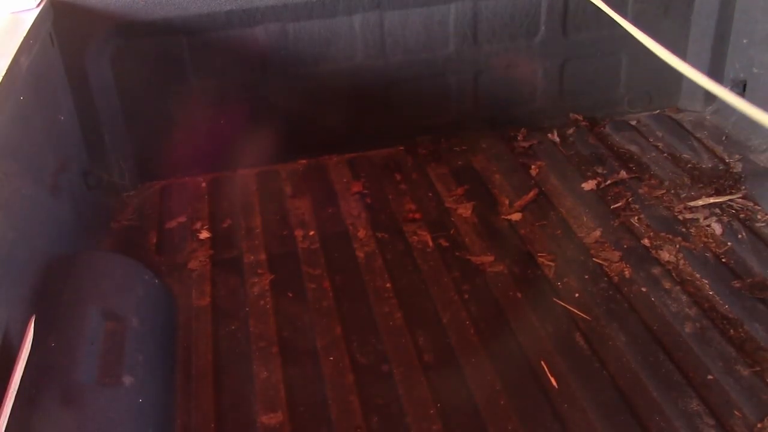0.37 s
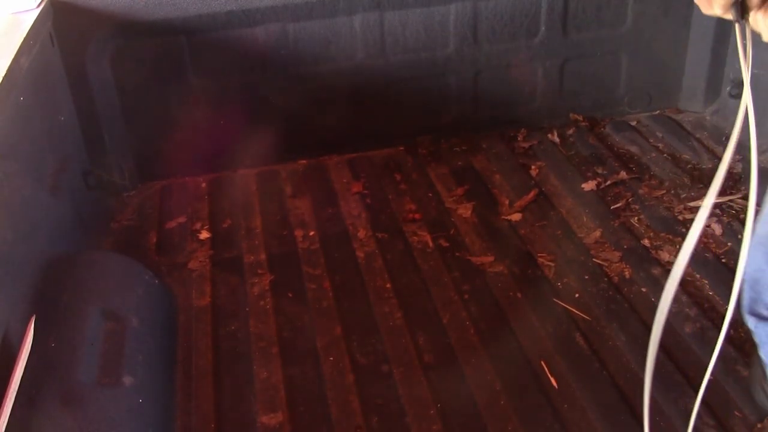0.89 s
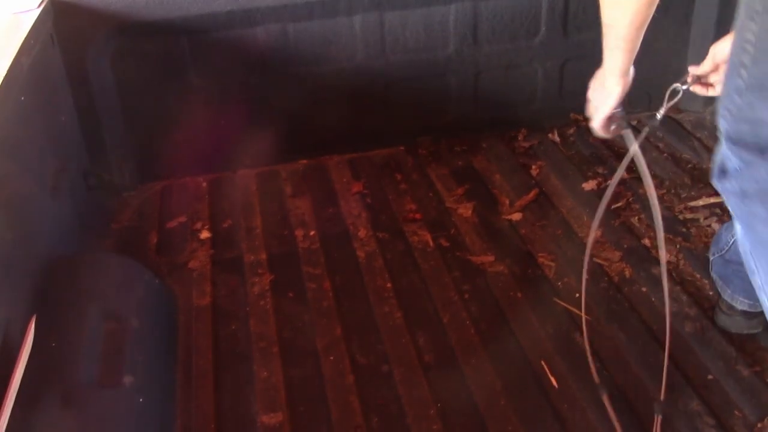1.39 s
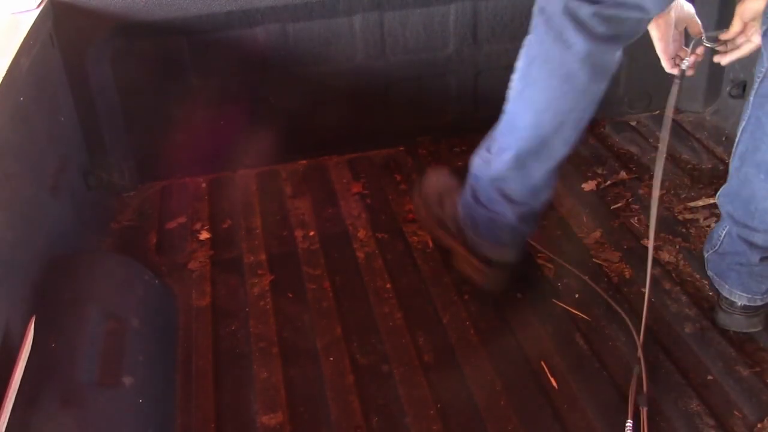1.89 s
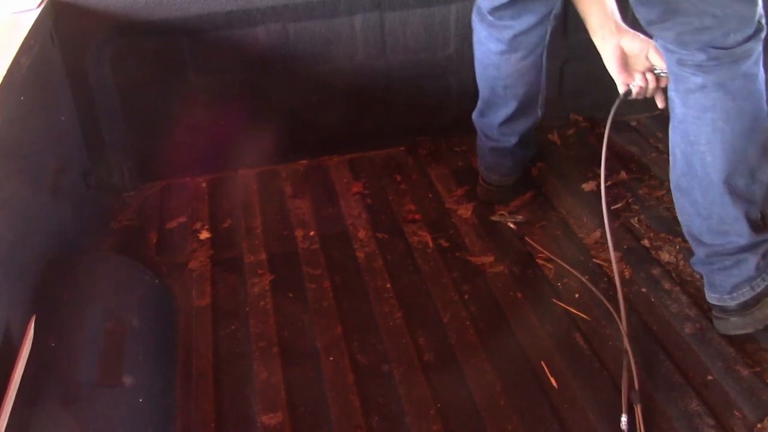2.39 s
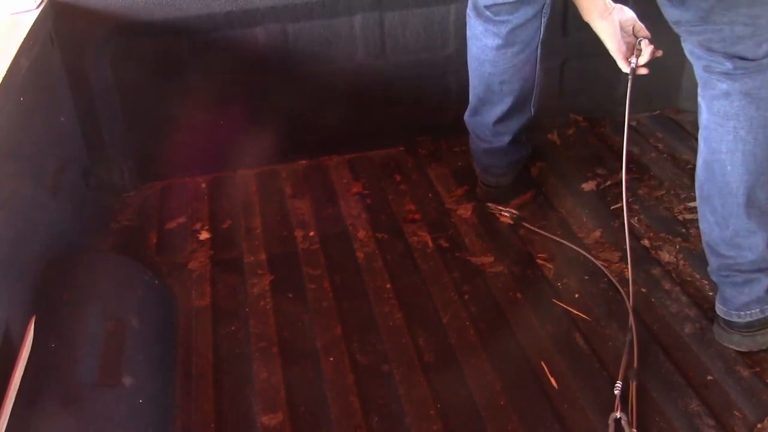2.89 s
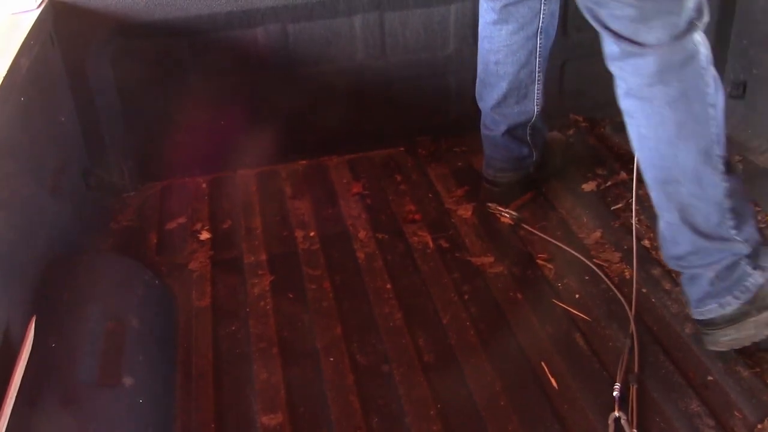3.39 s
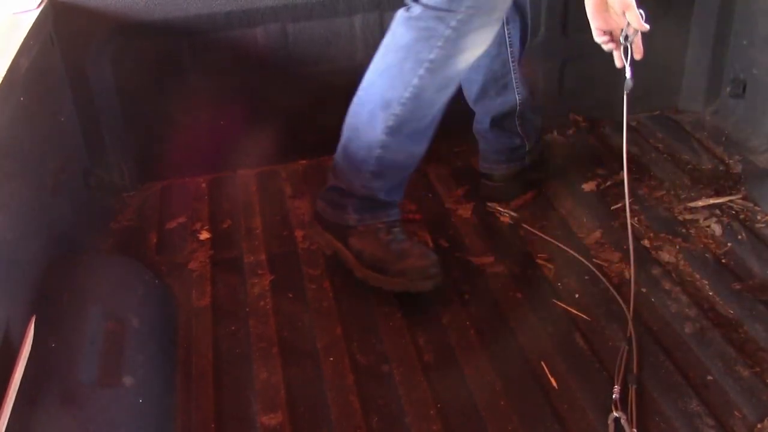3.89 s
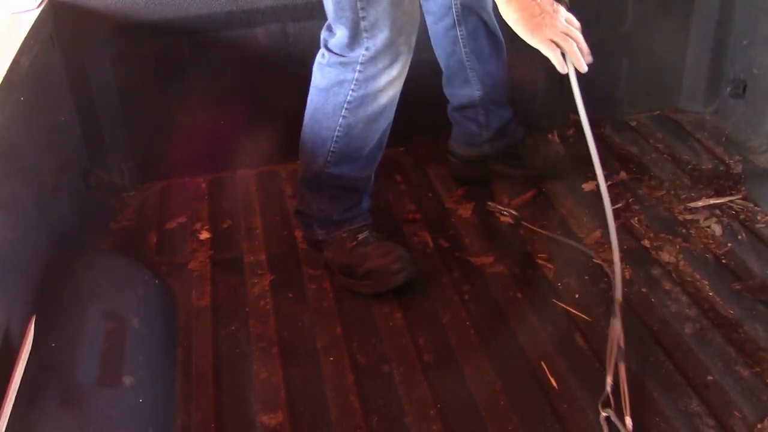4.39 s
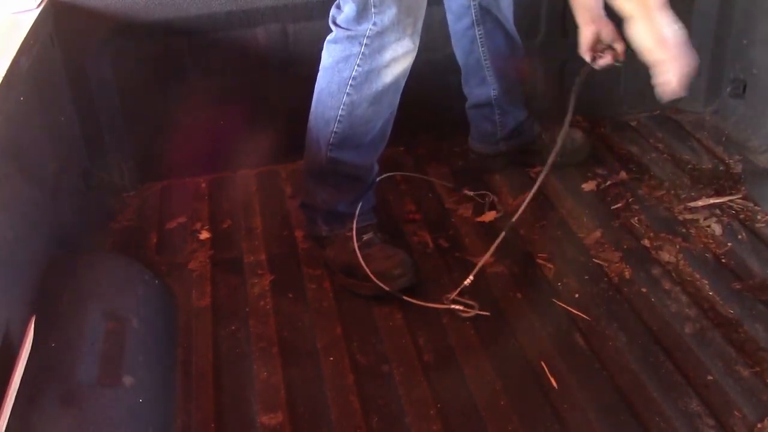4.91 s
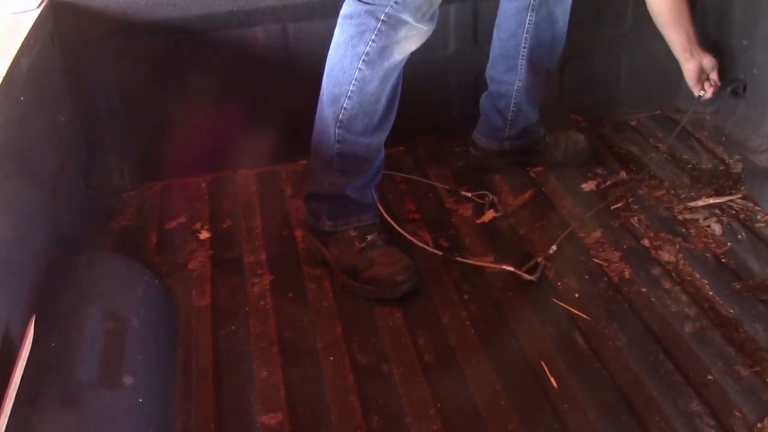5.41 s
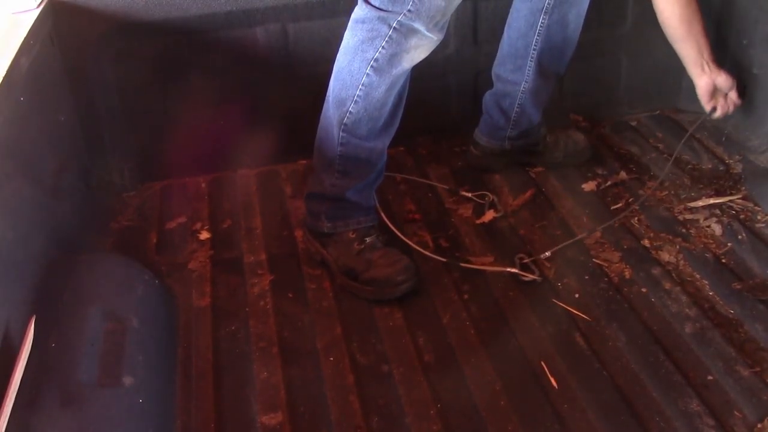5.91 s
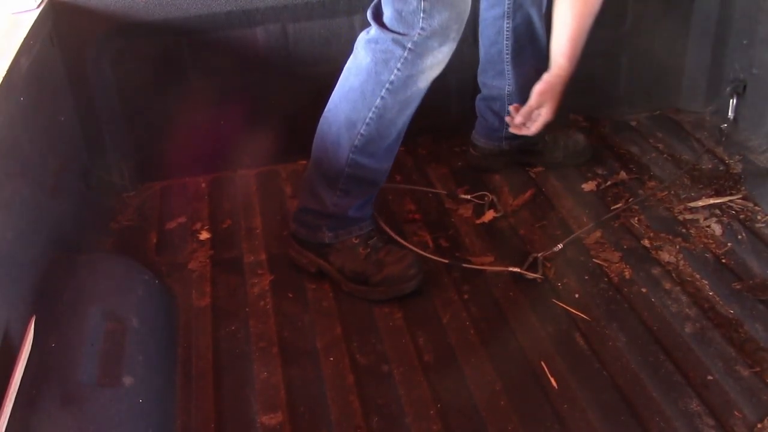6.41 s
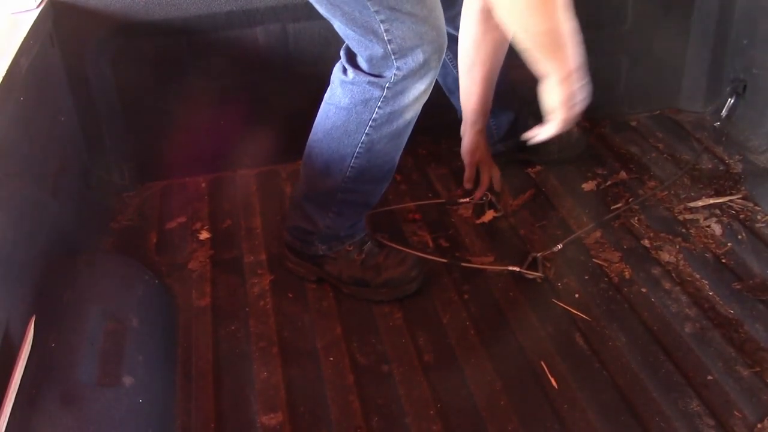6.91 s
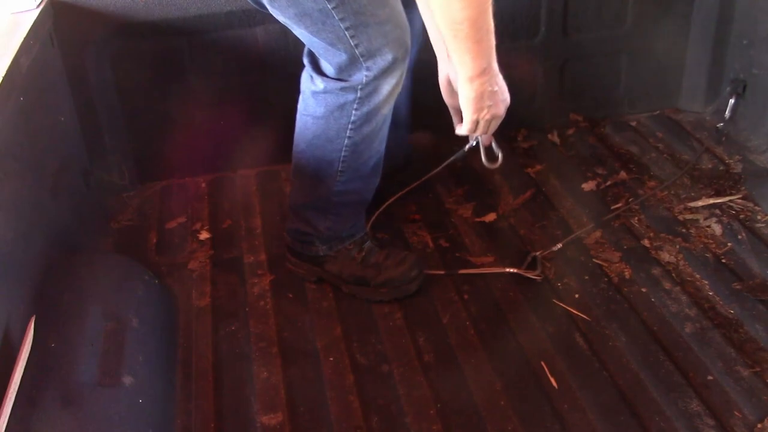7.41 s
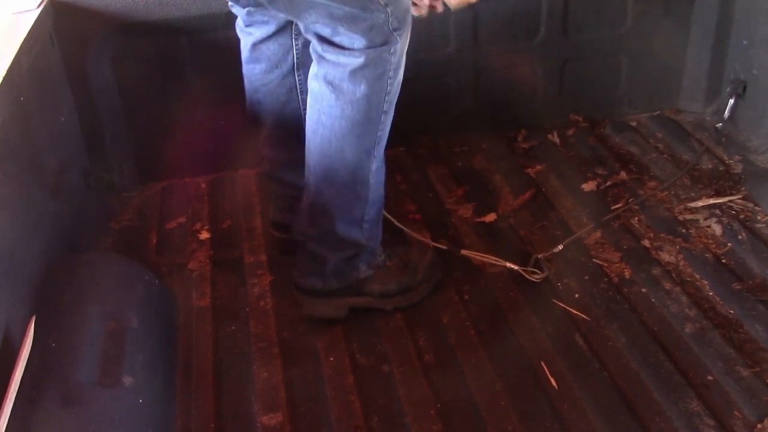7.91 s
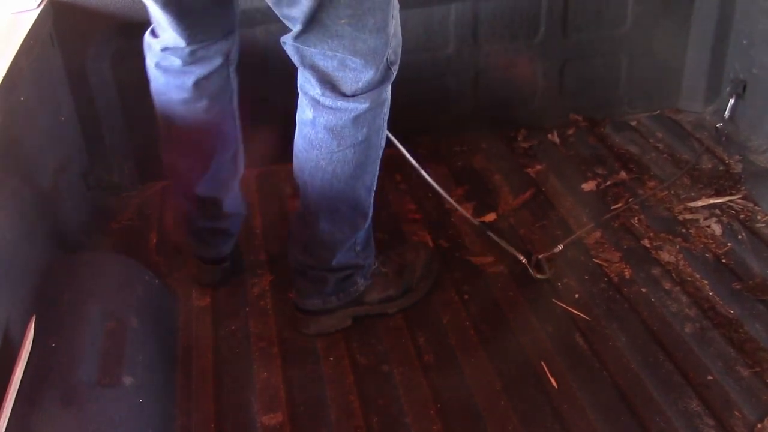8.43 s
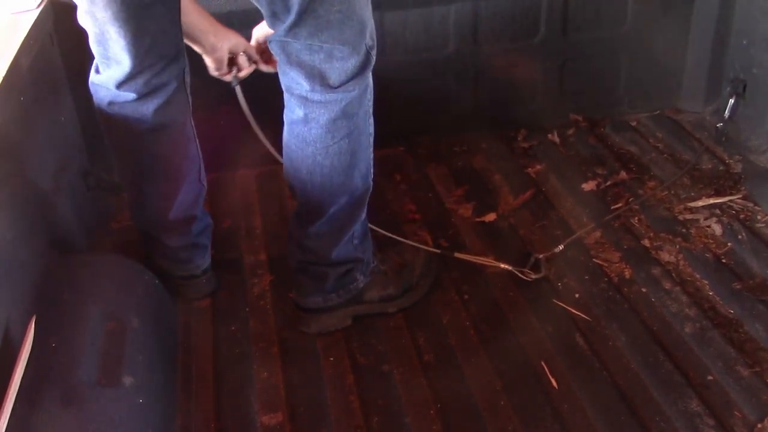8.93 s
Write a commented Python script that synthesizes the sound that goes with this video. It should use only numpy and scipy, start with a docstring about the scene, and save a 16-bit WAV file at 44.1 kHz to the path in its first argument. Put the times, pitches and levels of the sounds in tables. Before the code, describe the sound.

Close, dry knocks of footsteps and dropped cable on a plastic-lined pickup bed, with bright metal ticks, gritty scrapes and quiet outdoor air.

```python
"""Boots and cable on a truck bed

Someone steps about on the ribbed plastic liner of a pickup bed and handles a steel cable with a hook.
Boots and dropped steel ring the chassis, floor pan, ribs and thin liner as decaying modes.
Soles and cable drag over grit as uneven noise; the hook ticks with short bright noise and weak partials.
A faint squeak slides down. A small microphone lies close by in quiet open air."""
import sys
import numpy as np
from scipy import signal
from scipy.fft import rfft, irfft
from scipy.io import wavfile
from scipy.ndimage import uniform_filter1d

SR = 44100
rng = np.random.default_rng(int(sys.argv[2]) if len(sys.argv) > 2 else 0)


def materialize(psi):
    """Save the field psi as 16-bit PCM at rate SR to the path in sys.argv[1].

    A 1-D psi becomes a single channel; in a 2-D psi each row is a channel.
    """
    bounded = np.clip(np.atleast_2d(psi).T, -1, 1)
    quanta = np.round(bounded * 32767).astype(np.int16)
    wavfile.write(sys.argv[1], SR, quanta)


def to_linear_factor(level_db):
    """Convert decibel levels (scalar or array-like) to linear amplitude factors."""
    exponent = np.asarray(level_db, float) / 20
    return 10 ** exponent


N = 399105


def coloured(points, size):
    """Spectral shaping: noise of rms 1 whose spectrum follows (frequency [Hz], level [dB]) points."""
    hz, db = np.transpose(points)
    log_hz = np.log(np.arange(size // 2 + 1) * SR / size + 1)
    gain = to_linear_factor(np.interp(log_hz, np.log(hz), db))
    noise = irfft(rfft(rng.standard_normal(size)) * gain, size)
    return noise / noise.std()


def fade(t, t60):
    """Exponential decay: the level falls 60 dB in t60 seconds."""
    return np.exp(-np.log(1000) * t / t60)


def rings(modes, t):
    """Modal synthesis: one decaying sine a mode, neighbours in opposite sign, low modes starting gently."""
    hz, db, t60 = np.array(modes, float).T[:, :, None]
    sign = (-1.) ** np.arange(len(modes))[:, None]
    start = (1 - np.exp(-hz * t * 6.1)) ** 2
    decay = fade(t, np.maximum(t60, .02))
    return sign * to_linear_factor(db) * np.sin(2 * np.pi * hz * t) * decay * start


def grains(shape, spread_db):
    """Impulsive excitation: tiny impacts of either sign, few of them large."""
    return rng.standard_normal(shape) * to_linear_factor(spread_db * rng.standard_exponential(shape))


def rough(points, spread_db, ms):
    """Stick-slip friction: coloured noise of rms 1 whose level jumps from slip to slip."""
    hold = int(ms * SR / 1000) + 1
    jumps = np.repeat(rng.standard_normal(N // hold + 1), hold)[:N]
    jumps = uniform_filter1d(jumps, hold)
    noise = coloured(points, N) * to_linear_factor(spread_db * jumps)
    return noise / noise.std()


def resonant(peaks):
    """Resonance: spectrum points of a few peaks over a low floor."""
    hz = np.geomspace(200, 16000, num=400)
    power = sum(to_linear_factor(2 * db) / (1 + (2 * (hz - f) / w) ** 2) ** 2 for f, w, db in peaks)
    return np.c_[hz, 10 * np.log10(power + 1e-9)]


def strokes(table, rise_db_s, fall_db_s):
    """Envelope: gain of each level column; every stroke swells, holds and dies away, and powers add."""
    t, power = np.arange(N) / SR, np.zeros((len(table[0]) - 2, N))
    for s, hold, *db in table:
        # each stroke is cut where it lies 70 dB below its hold
        first = max(int((s - 70 / rise_db_s) * SR), 0)
        i = slice(first, int((s + hold + 70 / fall_db_s) * SR))
        rise, fall = (t[i] - s) * rise_db_s, (s + hold - t[i]) * fall_db_s
        shape = np.minimum(0, np.minimum(rise, fall))
        power[:, i] += to_linear_factor(2 * (np.array(db)[:, None] + shape))
    return np.sqrt(power)


def played(table):
    """Linear interpolation: a curve table's columns, one value a sample; its level is -120 dB outside."""
    s, *columns = np.transpose(table)
    return [np.interp(np.arange(N) / SR, s, c, left=-120, right=-120) for c in columns]


def add(out, sound, s):
    """Superposition: mixes a sound in at time s."""
    i = int(s * SR)
    out[i:i + len(sound)] += sound[:len(out) - i]


# spectrum of the quiet open air: (frequency [Hz], relative level [dB per Hz])
AIR = [(15, -19.5), (25, -4), (45, 1), (120, -9), (240, -11.5), (330, -18), (600, -20), (2300, -26.5),
       (6000, -29), (10500, -31), (14000, -33.5), (16000, -38.5)]


def air():
    """Stationary noise: a steady, low-heavy hush at -68 dB rms."""
    return to_linear_factor(-68) * coloured(AIR, N)


def yard(hits):
    """Diffuse reflection: the hits convolved with a short decaying noise, as nearby surfaces return it."""
    t, t60_s, return_db = np.arange(SR // 2) / SR, 0.26, -18.5
    spectrum = [(100, -15), (500, -2.5), (1200, -9.5), (4000, -9.5), (12000, -21.5)]  # (Hz, dB per Hz)
    echo = coloured(spectrum, len(t)) * fade(t, t60_s)
    echo = echo / np.sqrt(np.sum(echo ** 2))
    return to_linear_factor(return_db) * signal.fftconvolve(hits, echo)[:N]


# course of a faint falling squeak: (time [s], frequency [Hz], rms level [dB])
SQUEAK = [(7.41, 717, -83.5), (7.442, 716, -67.5), (7.452, 673, -66), (7.486, 604, -81), (7.51, 603, -80)]


def squeak():
    """Frequency modulation: the phase of a tone that slides down is its frequency summed over time."""
    hz, db = played(SQUEAK)
    return np.sqrt(2) * to_linear_factor(db) * np.sin(2 * np.pi * np.cumsum(hz) / SR)


# a sole brushed across the ribs: (time [s], hold [s], level [dB])
SCUFFS = [(3.775, 0.1, -57.5), (6.5, 0.084, -55), (6.61, 0.04, -52)]
# spectrum of the brushing: (frequency [Hz], relative level [dB per Hz])
SCUFF = [(290, -41), (500, -4), (960, -1.5), (1060, -5), (1230, -1), (1530, -5), (1980, -2), (6610, -17),
         (10700, -10.5), (16000, -30)]


def scuffs():
    """Sliding friction: a fine, fairly even hiss with clear ends."""
    gain = strokes(SCUFFS, rise_db_s=498, fall_db_s=450)[0]
    return gain * rough(SCUFF, spread_db=1.9, ms=24.0)


# cable pulled over an edge, stroke by stroke: (time [s], hold [s], rasp level [dB], jingle level [dB])
PULL = [(.285, .02, -52, -63), (.335, 0.029, -40.5, -55.5), (.44, 0.06, -39.5, -54),
        (.53, 0.029, -44, -59.5), (.595, .02, -45, -61), (.65, 0.0068, -53.5, -77)]
# wall resonances that colour the rasp: (frequency [Hz], width 6 dB down [Hz], relative level [dB])
RASP = [(660, 240, 3.5), (940, 490, -3.5), (1470, 330, 1.5), (1910, 310, -13)]
# resonances of the jingling hook: (frequency [Hz], width 6 dB down [Hz], relative level [dB])
JINGLE = [(2980, 670, -9), (3840, 737, 2), (5700, 1700, -2.5), (7840, 1400, -3.5), (10300, 2100, 0),
          (12540, 1400, -17)]


def cable():
    """Friction-driven resonance: strands rasp in the wall's resonances while the hook jingles."""
    rasp_gain, jingle_gain = strokes(PULL, rise_db_s=450, fall_db_s=400)
    rasp = rough(resonant(RASP), spread_db=1.6, ms=5.0)
    jingle = rough(resonant(JINGLE), spread_db=2.8, ms=9.9)
    return rasp_gain * rasp + jingle_gain * jingle


# modes of the bed's parts: (frequency [Hz], relative level [dB], t60 before any choking [s])
CHASSIS = [(44.7, -16.5, 0.13), (55, -1, 0.66), (74.5, -3.5, 0.93), (79.7, -2.5, 0.37)]
PAN = [(115, -6.5, 0.16), (153, -4.5, 0.23), (178.5, -4, 0.12), (229, -2, 0.14), (258, -10.5, 0.64)]
RIBS = [(289.6, -6, 0.2), (355, -3, 0.16), (409, -4.5, 0.16), (483.4, -3, 0.081), (551.1, -7.5, .15),
        (591, -8, 0.16), (672, -9, 0.051)]


def bed_parts(t):
    """Modal decomposition: mode frequencies and ringing modes of chassis, floor pan and ribs."""
    return [(np.array(modes)[:, 0], rings(modes, t)) for modes in (CHASSIS, PAN, RIBS)]


# spectrum of the thin liner, whose modes are too many to tell apart:
# (frequency [Hz], relative level [dB per Hz])
LINER = [(450, -29.5), (650, 6.5), (800, 5.5), (1100, -0.5), (1500, -6.5), (1900, -14.5), (2500, -25),
         (3500, -30.5), (9000, -76)]


def liner(t, t60):
    """High modal density: a crowd of close modes sounds as decaying noise, new at every call."""
    return coloured(LINER, len(t)) * fade(t, t60) * (1 - np.exp(-t / 0.0022)) ** 2


# weight shifting on the floor: (time [s], hold [s], chassis level [dB], body level [dB]);
# the pan and the ribs each sound a fixed step below the body level
SHIFTS = [(.24, 0.046, -65, -65), (.29, 0.11, -53, -54), (.44, 0.059, -46, -52.5), (.56, 0.18, -65, -65.5),
          (.775, 0.033, -42, -55), (1.17, 0.025, -40, -50), (1.57, 0.037, -51, -47.5),
          (.93, 0.073, -47, -35), (1.08, 0.41, -53.5, -39), (1.72, 0.085, -46, -32),
          (1.9, 0.024, -67, -45.5), (2.05, 0.11, -65, -64), (2.205, 0.066, -34, -53.5),
          (2.36, 0.045, -61, -58), (2.49, 0.16, -57, -50), (2.75, 0.014, -62, -56),
          (3.19, 0.041, -56, -66.5), (3.21, 0.012, -56, -56.5), (3.32, 0.077, -58, -59),
          (3.75, .14, -60.5, -70.5), (4.36, 0.038, -58, -55), (4.45, 0.13, -70.5, -66),
          (4.66, .1, -49.5, -49), (4.8, 0.097, -58, -32), (4.9, 0.29, -55, -47.5), (5.165, .04, -52, -38),
          (5.26, 0.071, -38, -39.5), (5.5, 0.037, -48.5, -40.5), (5.72, 0.092, -59, -42),
          (5.88, 0.015, -48, -30), (5.96, 0.15, -58.5, -41.5), (6.44, .04, -59.5, -65),
          (6.49, 0.14, -50.5, -58.5), (6.3, 0.052, -59.5, -64.5), (6.72, 0.033, -57, -78.5),
          (6.96, 0.031, -53, -71.5), (7.29, 0.063, -56.5, -58.5), (7.03, 0.12, -59.5, -52),
          (7.54, 0.084, -33.5, -47.5), (7.65, 0.026, -61, -49), (7.75, 0.027, -46, -70),
          (7.955, .02, -38, -53.5), (8.05, 0.25, -65, -67.5), (8.57, .06, -37, -56), (8.68, 0.12, -49, -63),
          (9.0, .05, -64, -67.5)]
# soles and cable sliding: (time [s], hold [s], liner level [dB], grit hiss level [dB])
SLIDES = [(.66, 0.66, -58.5, -70.5), (1.33, .06, -47.5, -69.5), (1.44, 0.19, -56.5, -71.5),
          (1.72, 0.12, -51.5, -67), (1.9, 0.023, -56.5, -72.5), (2.22, .05, -62.5, -66),
          (2.48, 0.18, -63.5, -76.5), (3.28, .07, -87, -82), (4.35, 0.64, -74.5, -76),
          (4.8, 0.053, -45.5, -63), (5.065, .03, -50.5, -68.5), (5.15, 0.15, -48, -64.5),
          (5.33, 0.22, -60.5, -71), (5.72, 0.051, -58, -69), (5.83, 0.084, -49, -60),
          (6.0, 0.19, -66.5, -68.5), (6.6, 0.032, -76, -65), (7.03, 0.048, -88.5, -72),
          (7.36, .02, -80, -75), (7.68, 0.18, -73, -77.5), (7.97, 0.25, -73, -76), (8.65, .04, -67, -74)]
# spectrum of the grit: (frequency [Hz], relative level [dB per Hz])
GRIT = [(1180, -32.5), (2000, -3), (2460, -6), (3230, -4), (3770, -7.5), (5990, -7), (6880, -8.5),
        (11000, -5.5), (16000, -37)]


def dragging(t):
    """Stick-slip excitation: dense slips drive the parts, damped by the weight; liner and grit hiss."""
    chassis, body = strokes(SHIFTS, rise_db_s=800, fall_db_s=170)
    sheet, grit = strokes(SLIDES, rise_db_s=250.5, fall_db_s=120.5)
    out = sheet * rough(LINER, 5.5, 11.0) + grit * rough(GRIT, 1.5, 11.0)
    gains = (chassis, body * to_linear_factor(-2.0), body * to_linear_factor(-3.5))
    for (_, ringing), gain in zip(bed_parts(t), gains):
        slips = grains(N, 2.2) * (rng.random(N) < .08)
        damped = ringing.sum(0) * fade(t, 0.087)
        ring = signal.fftconvolve(slips, damped)[:N]
        out = out + gain * ring / ring.std()
    return out


# hook, cable and grit clicks:
# (time [s], relative crack level [dB], relative bright edge level [dB], glint [Hz], tail t60 [s])
TICKS = [(0.434, -44.5, -40, 9340, 0.2), (0.5822, -45, -40, 8500, 0.077), (0.7631, -54, -58, 7990, 0.2),
         (0.8549, -59, -46.5, 8100, 0.12), (0.8898, -44.5, -53, 3800, 0.33),
         (0.9384, -54, -39, 10000, 0.13), (1.155, -27, -43, 4000, 0.14),
         (1.3891, -50.5, -51.5, 10100, 0.25), (1.4933, -46, -63.5, 3610, 0.13),
         (1.6143, -26, -27, 10600, 0.17), (1.6244, -26, -31, 10200, 0.11),
         (2.1968, -56.5, -50, 10000, 0.13), (2.2098, -46.5, -46, 10300, 0.26),
         (2.2383, -57, -48, 9100, 0.23), (3.2094, -64, -62, 6420, 0.13),  (4.5849, -54, -55, 5260, 0.21),
         (4.797, -53, -52.5, 9560, 0.091), (4.8542, -48, -48, 3660, 0.11), (4.8724, -60, -52, 9360, 0.092),
         (4.9366, -70, -54, 9600, 0.093), (5.057, -47.5, -79, 3640, 0.14),
         (5.2524, -44.5, -50, 10700, 0.33), (5.4115, -43, -49.5, 6540, 0.16),
         (5.5054, -40.5, -48.5, 6880, 0.076), (5.524, -30.5, -36.5, 9860, 0.1),
         (5.6634, -33, -43.5, 4600, 0.075), (5.6849, -28, -34.5, 9320, 0.077),
         (5.799, -3, -16.5, 3840, 0.12), (5.8074, -9.5, -11, 9560, 0.083),
         (5.9544, -42.5, -49, 3730, 0.075), (6.0058, -43.5, -56, 4130, 0.12),
         (6.0456, -33.5, -53, 3700, 0.13), (6.3025, -55.5, -57, 8700, 0.097),
         (7.0194, -74, -59.5, 9640, 0.17), (7.1221, -54, -56, 9910, 0.16), (7.3356, -36, -55, 4670, 0.083),
         (7.5262, -45, -49.5, 4020, 0.33), (7.9444, -57, -64, 7760, 0.34), (8.5581, -39, -65, 4430, 0.12)]
# spectra of the dry crack and the bright edge: (frequency [Hz], relative level [dB per Hz])
CRACK = [(400, -49.5), (1000, -12.5), (1800, 3), (3000, -6.5), (5000, -14), (7000, -21), (14000, -50)]
EDGE = [(1500, -51), (4000, -15.5), (6000, -1.5), (8000, -2.5), (10300, 1), (13000, -9), (16000, -16.5)]
# steel hook and its ring: (frequency [Hz], relative level [dB], t60 before the tail's own fade [s])
HOOK = [(1468, 1, 0.45), (1816, -3, 0.22), (1930, -8, 0.33), (2439, -5, 0.17), (2960, -6, 0.073),
        (3070, -12.5, 0.3), (3655, -10.5, 0.15), (3760, -18.5, 0.32), (4247, -14.5, 0.14),
        (6700, -14.5, 0.13)]


def ticks():
    """Impact radiation: a dry bright crack, a hissing tail off the bed walls, a glint, weak steel partials."""
    out, t = np.zeros(N), np.arange(SR // 4) / SR
    partials = rings(HOOK, t)
    hook_db, spread_db = -18, 6.3  # partials against the crack, and their random spread
    for s, crack_db, edge_db, hz, t60 in TICKS:
        hiss = to_linear_factor(crack_db) * coloured(CRACK, len(t)) + to_linear_factor(edge_db) * coloured(EDGE, len(t))
        glint = 1.8 * to_linear_factor(edge_db) * np.sin(2 * np.pi * hz * t) * fade(t, 0.03)
        steel = to_linear_factor(crack_db + hook_db + spread_db * rng.standard_normal(len(HOOK))) @ partials
        crack_and_tail = .5 * fade(t, .03) + 0.61 * fade(t, max(t60, .01))
        sound = hiss * crack_and_tail + glint
        onset = 1 - np.exp(-t / .0003)
        add(out, 0.5 * sound * onset + steel * fade(t, 1.5 * t60), s)
    return out


# blows: (time [s], floor pan peak [dB], ribs peak [dB], liner peak [dB], favoured pitch [Hz])
KNOCKS = [(0.761, -39, -40.5, -45, 122), (.888, -39, -36, -33.5, 320), (.905, -27, -8, -24.5, 516),
          (.936, -36, -7, -26.5, 323), (1.062, -18, -36, -49, 277), (1.154, -29.5, -10.5, -18, 466.5),
          (1.319, -45, -39.5, -43, 355), (1.397, -43, -27, -39, 363.5), (1.451, -38.5, -26.5, -36.5, 382.5),
          (1.49, -36, -30, -33, 310), (1.614, -10.5, -4, -5.5, 457), (1.629, -4.5, -4, -24.5, 163.6),
          (1.645, -10.5, -7, -21, 355), (1.829, -27, -21.5, -41, 226), (2.154, -56, -46.5, -49, 234),
          (2.192, -18.5, -27, -45.5, 130), (2.238, -31.5, -38.5, -65, 160), (2.47, -46, -43, -47.5, 258),
          (2.691, -39.5, -67, -76, 246), (2.78, -46, -52, -64, 129), (3.187, -48, -51.5, -63, 154),
          (3.3, -42.5, -54, -57.5, 167), (3.414, -44, -55, -82, 167), (3.618, -63.5, -57, -56.5, 232),
          (4.045, -39.5, -55, -59.5, 137), (4.086, -22.5, -33.5, -54.5, 131.3),
          (4.335, -43, -43, -46.5, 229), (4.584, -37.5, -39, -43, 127), (4.681, -31.5, -36.5, -54, 236),
          (4.752, -39, -27.5, -31, 420), (4.773, -15, -11, -32.5, 234), (4.835, -21.5, -18.5, -26, 223),
          (4.862, -42, -20, -28, 425), (5.021, -70, -42, -57, 468), (5.057, -56, -58, -35.5, 334),
          (5.146, -30, -22.5, -29.5, 228), (5.252, -39, -31, -34, 122), (5.308, -29, -36, -37, 240),
          (5.42, -32.5, -38, -56.5, 208), (5.521, -26.5, -22, -30.5, 169), (5.663, -43, -29.5, -34, 498),
          (5.686, -18.5, -21.5, -30.5, 137), (5.797, -0.5, -4, -13.5, 148.6), (5.881, -16.5, -29, -50, 149),
          (5.926, -23.5, -36, -48, 150), (6.009, -38, -57, -43, 141), (6.046, -28, -29, -38.5, 153),
          (6.115, -35.5, -27, -46, 380), (7.008, -34, -56, -59, 184), (7.036, -29, -30.5, -45.5, 127),
          (7.123, -39, -46, -49.5, 138), (7.286, -50.5, -51.5, -61, 128), (7.335, -50, -40.5, -39.5, 265),
          (7.524, -20, -18, -32.5, 135), (7.553, -15, -32, -42, 110), (7.6, -28, -39, -55, 250),
          (7.941, -34, -50, -51.5, 115), (8.027, -37, -45, -53.5, 251), (8.231, -47.5, -66, -70, 198.5),
          (8.495, -36.5, -47, -60, 172), (8.558, -15.5, -19, -35, 224)]
LINER_T60_S, RATTLE_MS, HEAVY_RATTLE = .15, 7.0, 0.28  # the rattle's force swells until about RATTLE_MS
# each blow lands elsewhere: random spread of the modes, and how they favour one pitch
PLACE_DB, PLACE_OCTAVES, FAR_DB_PER_OCTAVE = 3, 0.21, 3.5
# the chassis takes a share of the pan's blow, more from a broad, low-pitched one
CHASSIS_DB, CHASSIS_PER_PAN_DB, CHASSIS_DB_PER_OCTAVE = -28, 0.5, -1.5
SETTLE_S = 0.098  # for a 0 dB blow: the boot or cable stays down and chokes the ring


def knocks(t):
    """Impact excitation: a sharp first touch and a loose rattle of liner on steel set every part ringing."""
    out, touch = np.zeros(N), t[:SR // 16]
    parts = bed_parts(t)
    for s, pan_db, ribs_db, liner_db, hz in KNOCKS:
        pitch_db = CHASSIS_DB_PER_OCTAVE * np.log2(hz / 200)
        chassis_db = CHASSIS_DB + CHASSIS_PER_PAN_DB * pan_db + pitch_db
        force = grains(len(touch), 2.5) * touch * np.exp(-1000 * touch / RATTLE_MS)
        force = force / np.sqrt(np.sum(force ** 2))
        # the heavy chassis and pan feel mostly the first touch
        heavy = HEAVY_RATTLE * force
        force[0] = heavy[0] = 1.2
        # a harder blow is choked later
        settle = SETTLE_S * to_linear_factor(.15 * max(pan_db, ribs_db))
        choke = np.exp(-(t / settle) ** 2)
        sounds = [liner(t, LINER_T60_S)]
        for mode_hz, ringing in parts:
            octaves = np.log2(mode_hz / hz)
            near_db = 8.6 * np.exp(-(octaves / PLACE_OCTAVES) ** 2) - FAR_DB_PER_OCTAVE * np.abs(octaves)
            place_db = PLACE_DB * rng.standard_normal(len(mode_hz))
            sounds.append(to_linear_factor(near_db + place_db) @ ringing)
        levels = (liner_db, chassis_db, pan_db, ribs_db)
        pushes = (force, heavy, heavy, (force + heavy) / 2)
        for sound, db, push in zip(sounds, levels, pushes):
            ring = signal.fftconvolve(push, sound * choke)
            add(out, to_linear_factor(db) * ring / np.abs(ring).max(), s)
    return out


def scene():
    """Superposition: blows, clicks and friction, a short return from nearby surfaces, and quiet air."""
    t = np.arange(SR // 2) / SR
    hits = knocks(t) + ticks()
    friction = dragging(t) + scuffs() + cable() + squeak()
    return (hits + yard(hits) + friction + air())[None]


def roll_off(x):
    """The treble ends steeply here."""
    return signal.sosfilt(signal.butter(12, 16480, fs=SR, output="sos"), x)


def record(dry):
    """Saturation and band limiting: the input rounds loud peaks, sheds the deepest bass and cuts the top."""
    rounded = np.tanh(1.227 * dry) / 1.147
    bass_cut = signal.butter(1, 25., "high", fs=SR, output="sos")
    top_cut = signal.ellip(8, .2, 60, 15900, fs=SR, output="sos")
    rounded = signal.sosfilt(bass_cut, rounded)
    finished = signal.sosfilt(top_cut, rounded)
    return roll_off(finished)


dry = scene()
out = record(dry)
materialize(out)
```